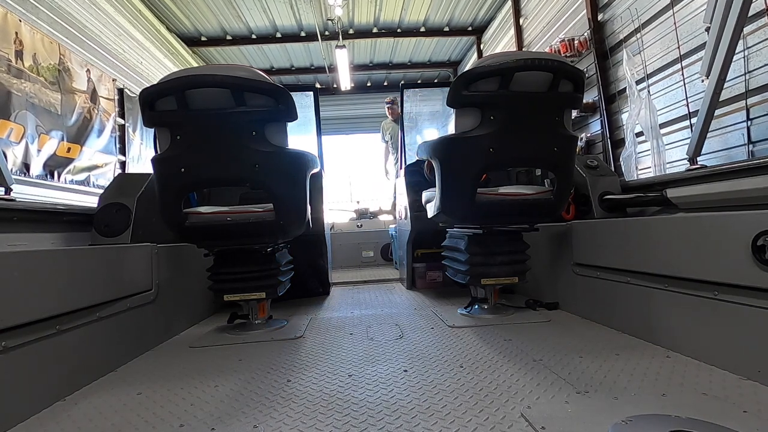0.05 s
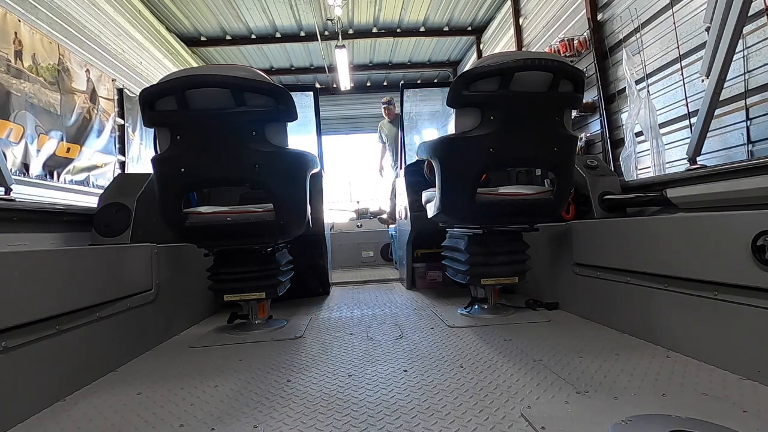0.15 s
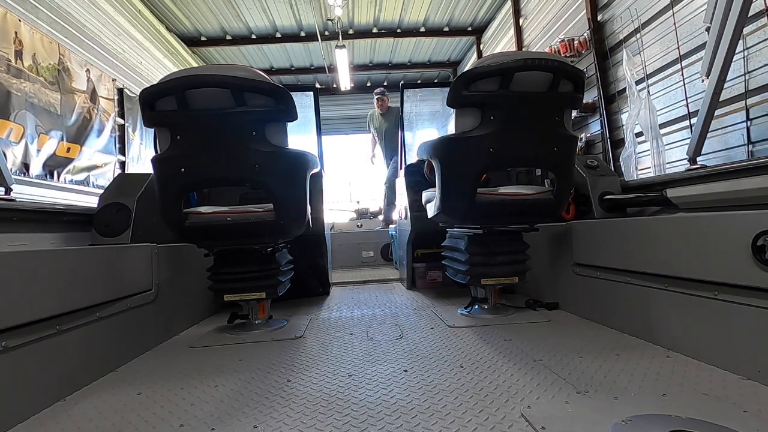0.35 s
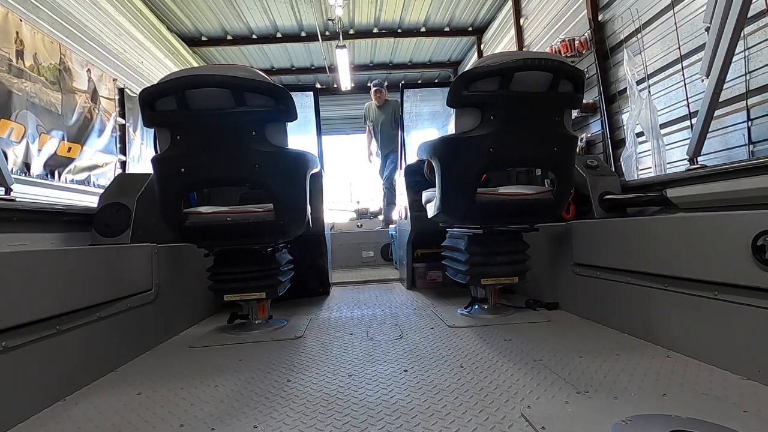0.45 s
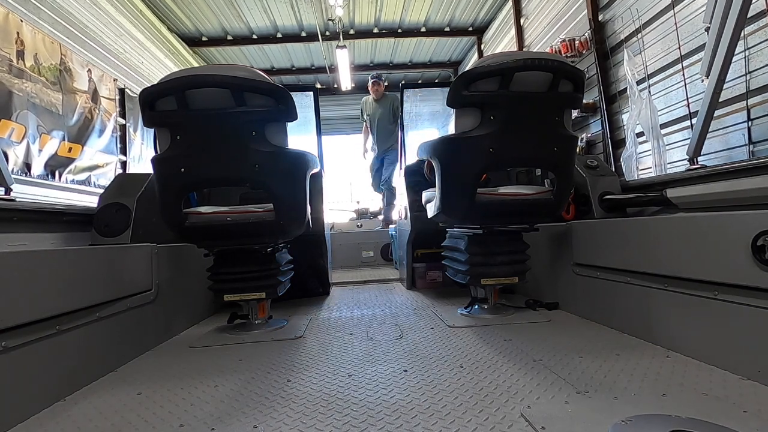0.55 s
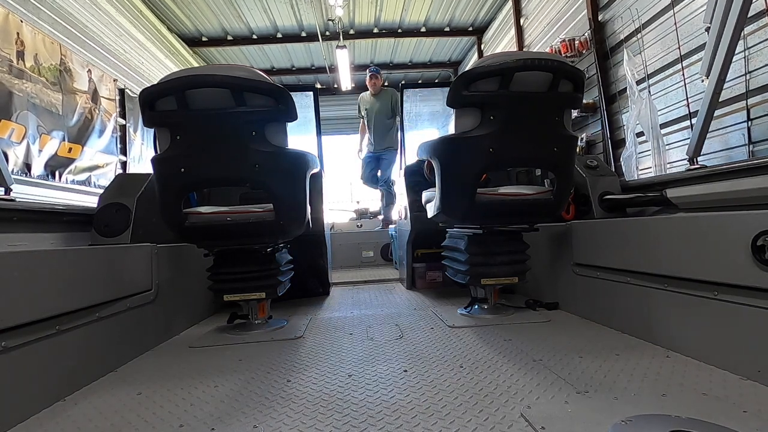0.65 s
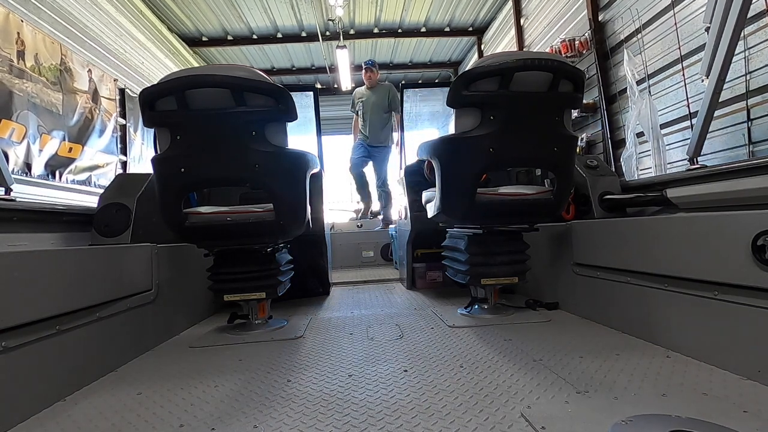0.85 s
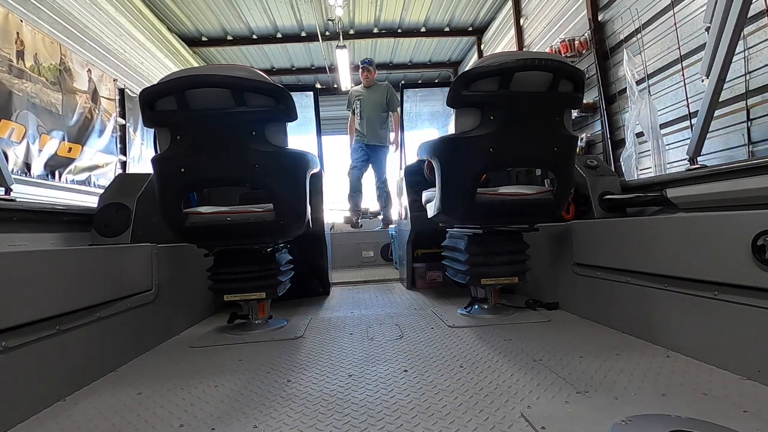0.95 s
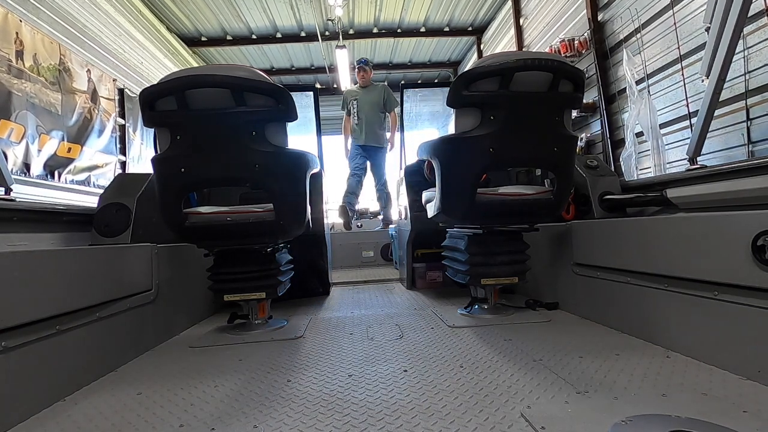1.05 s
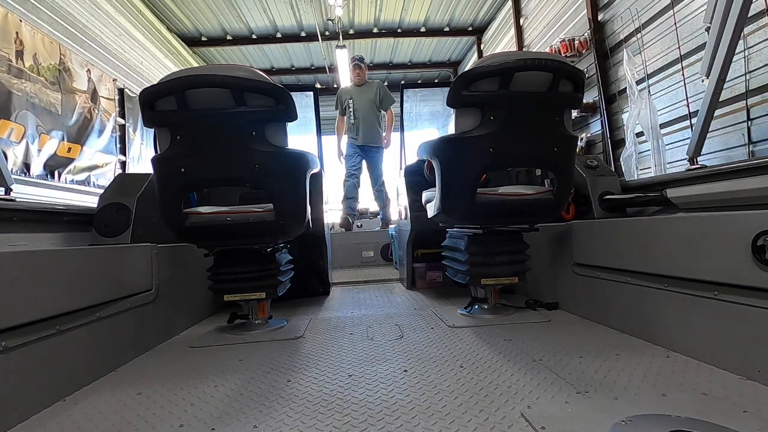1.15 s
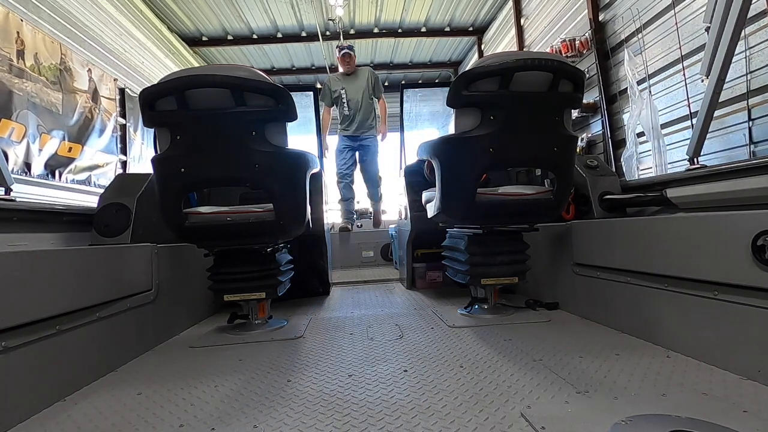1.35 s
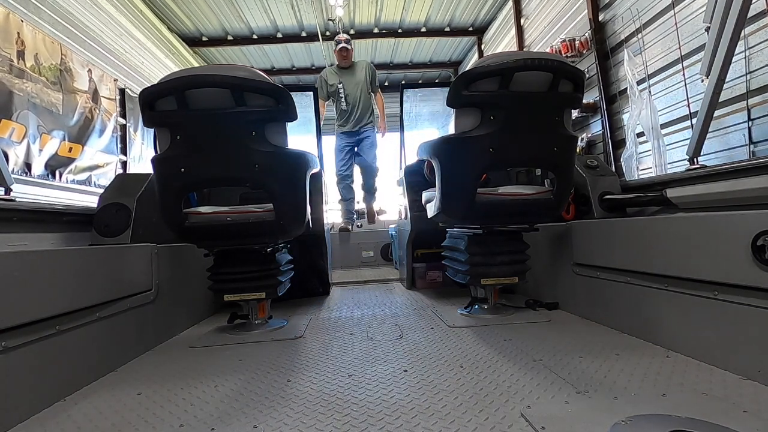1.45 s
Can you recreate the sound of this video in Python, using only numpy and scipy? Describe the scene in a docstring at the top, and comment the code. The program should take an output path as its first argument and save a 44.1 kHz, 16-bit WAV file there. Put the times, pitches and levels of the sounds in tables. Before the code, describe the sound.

Footsteps thud onto a boat's metal deck, with sharp clicks and a shed's echo.

```python
"""An aluminium hull booms as someone steps aboard a boat parked in a large metal shed.
A heavy footfall and softer ones knock on the metal plates and set them ringing, and the shed echoes.
Fittings snap as the deck takes the weight, and the boat shudders on its supports. Shoes tap, scuff
and press on grit, clothes rustle and something small jingles faintly over the hum of the shed."""
import sys
import numpy as np
from scipy import signal
from scipy.io import wavfile
from scipy.ndimage import uniform_filter1d

SR = 44100
rng = np.random.default_rng(int(sys.argv[2]) if len(sys.argv) > 2 else 0)


def digitize_waveform(pressure):
    """Quantize a signal to 16-bit integers and store it at the path in sys.argv[1].

    Rows of a 2-D input are taken as channels; values are limited to [-1, 1].
    """
    field = np.atleast_2d(pressure).T
    bounded = np.clip(field, -1, 1)
    quanta = np.round(bounded * 32767).astype(np.int16)
    wavfile.write(sys.argv[1], SR, quanta)


N = 66150
T = np.arange(N) / SR
BAND_EDGES_HZ = np.geomspace(28, 16500, 31)

# A "colour" says how strong each pitch of a noise is. "t60" is the time a sound takes to fade by 60 dB.
# colour of the air in the shed: f/Hz, level/dB
AIR_COLOUR = [(30, 5.5), (70, -6), (140, -6.5), (250, -12.5), (500, -19.5), (1000, -25), (2500, -31.5),
              (6500, -36), (10000, -40.5), (16000, -45)]
# strength of the boat's shudder: t/s, level/dB
SHUDDER_LEVEL = [(0, -41), (.2, -69.5), (.35, -44.5), (.52, -41), (.8, -45), (1.0, -44.5), (1.14, -52),
                 (1.28, -39), (1.5, -47.5)]
# loudness of the clothes: t/s, level/dB
CLOTH_LEVEL = [(0, -77), (.45, -64.5), (.62, -66), (.8, -65.5), (.88, -70.5), (.95, -67), (1.08, -71.5),
               (1.5, -61)]
# colour of the clothes: f/Hz, level/dB
CLOTH_COLOUR = [(200, 0), (700, 3), (1500, -0.5), (4000, -8.5), (8500, -10.5), (11000, -21), (16000, -22)]
# jingles of small metal: t/s, level/dB
JINGLE_EVENTS = [(.13, -71), (.55, -66), (0.906, -61)]
# pitches of the jingle: f/Hz, level/dB
JINGLE_TONES = [(6200, 2.5), (6620, -1), (9600, -7)]
# colour of grit under the sole: f/Hz, level/dB
GRIT_COLOUR = [(500, -11), (1500, 7), (3000, -1.5), (7000, -6), (10000, -11.5), (16000, -27)]
# light scuffs of a shoe: t/s, level/dB
SCUFF_EVENTS = [(0.129, -62), (.755, -59), (0.819, -66.5), (.907, -62.5), (.945, -57), (1.133, -60),
                (1.177, -45.5)]
# colour of a scuff: f/Hz, level/dB
SCUFF_COLOUR = [(700, -14), (1800, -6.5), (3000, -1), (4000, -4), (5000, -10.5), (9000, -26), (16000, -32)]
# snaps of the deck fittings: t/s, level/dB
SNAP_EVENTS = [(0.2718, -36), (1.3272, -41), (1.4296, -39.5)]
# colour of a snap: f/Hz, level/dB
SNAP_COLOUR = [(300, 3.5), (1200, -1.5), (2000, -2), (3200, -2.5), (4800, 0), (7500, 1), (9300, -3.5),
               (11000, -2.5), (14200, -12.5), (16500, -13)]
# how long a snap lingers in the shed: f/Hz, t60/s
SNAP_ECHO_FADE = [(1000, 0.49), (5000, 0.52), (14000, 0.33)]
# ringing tones of a fitting: f/Hz, level/dB, t60/s
FITTING_TONES = [(2815, -3, 0.071), (3900, -1.5, 0.15), (4565, -0.5, 0.13), (4860, -1.5, 0.11),
                 (6400, -11, .08), (7080, 0.5, .07)]
# light footfalls: t/s, level/dB, dull above f/Hz
TAP_EVENTS = [(0.031, -49, 380), (.412, -36.5, 128), (.533, -41, 171), (0.609, -43, 405), (.91, -44.5, 360),
              (1.012, -44, 386)]
# colour of a light footfall: f/Hz, level/dB
TAP_COLOUR = [(50, -16), (110, 5.5), (220, 1), (400, -0.5), (1000, -12), (3000, -10.5)]
# heel and sole landings: t/s, level/dB, dull above f/Hz, bass lift/dB, fade time factor,
# place (0 = boat's edge, 1 = deck), knock level/dB
CONTACTS = [(0.2426, -8, 553, 9, 0.47, 0, -7), (0.2505, -6.5, 737, 0, 0.88, 0.071, -5),
            (.2604, -4.5, 707, -15, 1, 0.17, 6.5), (1.1771, -20.5, 1420, 10, 0.94, 0.76, -8.5),
            (1.1895, -17.5, 1400, 8.5, 0.97, 0.92, -4.5), (1.288, -32.5, 350, 27, 0.76, 0, -13),
            (1.304, -27, 1270, 23.5, 0.73, 0.019, -20)]
# short swings of the plate under the foot: f/Hz, level/dB, t60/s
KNOCK_TONES = [(64.5, -27, 0.13), (123, -22.5, 0.051), (243, -21.5, 0.0074), (472, 1, 0.0074),
               (760, -13.5, .005)]
# main tones of the hull: f/Hz, level/dB when hit at the edge, level/dB when hit on the deck, t60/s
HULL_TONES = [(105.6, -17, -6, 0.78), (162, -3.5, 9, 0.32), (199, -14, 11, 0.27), (222, 1, -1.5, .55),
              (258, -2.5, -5, 0.56), (289.9, -1, -13, 0.54), (381.4, -2, 8.5, 0.33), (400.5, -4, 2, 0.43),
              (443.2, 3, -25, 0.48), (488.7, 1.5, -10, .44), (548, -9, -17, 0.25), (597, 6, -14.5, 0.41),
              (674.4, 1.5, 2.5, 0.46), (707, 5, -14, 0.27), (752, 6, -18, 0.46), (846, 2.5, -3, .4),
              (883, 1.5, -35, .3), (1195, -5, 4, 0.21)]
# colour of the boom, a blur of many close hull tones: f/Hz, level/dB
BOOM_COLOUR = [(40, -12.5), (80, -11), (150, -5.5), (250, -3.5), (450, 1.5), (750, -5), (1200, -10),
               (2000, -14), (4000, -10.5), (16000, -57)]
# how long the hull booms: f/Hz, t60/s
BOOM_FADE = [(60, 0.8), (150, 0.82), (450, 0.39), (1000, 0.57), (4000, 0.79), (14000, .35)]
# how long the shed echoes a footfall: f/Hz, t60/s
SHED_ECHO_FADE = [(200, 1.2), (1500, 1.56), (6000, .8), (14000, .4)]


def from_db(db):
    """Turn decibels into a number to multiply by."""
    return 10 ** (np.asarray(db) / 20)


def at_hz(table, hz):
    """Read a table between its rows, giving each octave equal room."""
    pitches, values = np.transpose(table)
    return np.interp(np.log(hz), np.log(pitches), values)


def band_noise(low, high):
    """Noise between two pitches, evened out to a steady strength of 1."""
    band = signal.butter(2, [low, high], "band", fs=SR, output="sos")
    noise = signal.sosfilt(band, signal.sosfilt(band, rng.standard_normal(N + SR // 2)))
    span = int(SR * max(.02, 1.5 / (high - low)))
    strength = np.sqrt(np.abs(uniform_filter1d(noise * noise, span)) + 1e-20)
    return (noise / strength)[-N:]


def shaped_noise(colour, loudness):
    """Noise of a given colour; each narrow band rises and falls with loudness(hz)."""
    lows, highs = BAND_EDGES_HZ[:-1], BAND_EDGES_HZ[1:]
    centres = np.sqrt(lows * highs)
    gains = from_db(at_hz(colour, centres)) * np.sqrt(highs - lows)
    gains /= np.linalg.norm(gains)
    return sum(gain * loudness(hz) * band_noise(low, high)
               for gain, hz, low, high in zip(gains, centres, lows, highs))


def burst(start, rise_s, t60, db=0):
    """Energy of a blow: it rises, then fades. Its square root is the height of the wave."""
    age = np.maximum(T - start, 0)
    fade = np.exp(-np.minimum(2 * np.log(1000) * age / t60, 100))
    return from_db(db) ** 2 * np.minimum(age / rise_s, 1) * fade


def ring(clicks, hz, t60):
    """Each click starts a fading tone as strong as the click."""
    fade = np.exp(-np.log(1000) / (t60 * SR))
    angle = 2 * np.pi * hz / SR
    return signal.lfilter([0, np.sin(angle)], [1, -2 * fade * np.cos(angle), fade ** 2], clicks + 1e-18)


def shed(hum_hz=126.7):
    """The shed gives a steady rush of air and a low hum."""
    air = shaped_noise(AIR_COLOUR, lambda hz: 1)
    hum = np.sqrt(2) * np.sin(2 * np.pi * hum_hz * T)
    return from_db(-55) * air + from_db(-63.5) * hum


def shudder(low_hz=11, high_hz=19):
    """The whole boat wobbles on its supports."""
    return from_db(np.interp(T, *np.transpose(SHUDDER_LEVEL))) * band_noise(low_hz, high_hz)


def clothes():
    """Cloth rustles faintly as the leg swings over."""
    level = from_db(np.interp(T, *np.transpose(CLOTH_LEVEL)))
    return shaped_noise(CLOTH_COLOUR, lambda hz: level)


def jingles(spread_hz=230):
    """Small metal shimmers briefly in clusters of high tones."""
    shimmer = sum(from_db(db) * band_noise(hz - spread_hz, hz + spread_hz) for hz, db in JINGLE_TONES)
    energy = sum(burst(start, rise_s=.002, t60=.35, db=db) for start, db in JINGLE_EVENTS)
    return shimmer / 2 * np.sqrt(energy)


def soles():
    """Grit hisses under each step, louder under a hard one; the shoe also scuffs lightly."""
    grit = np.sqrt(sum(burst(start, rise_s=.012, t60=.39 * length, db=-40.5 + .51 * db)
                       for start, db, _, _, length, _, _ in CONTACTS))
    scuffs = np.sqrt(sum(burst(start, rise_s=.00054, t60=.06, db=db) for start, db in SCUFF_EVENTS))
    return shaped_noise(GRIT_COLOUR, lambda hz: grit) + shaped_noise(SCUFF_COLOUR, lambda hz: scuffs)


def fitting_snaps():
    """A fitting takes the weight with a bright crack that lingers in the shed."""
    def loudness(hz):
        stretch = (7000 / hz) ** .68   # low pitches last longer, but start weaker
        energy = 0
        for start, db in SNAP_EVENTS:
            crack = min(1 / stretch, 2) * burst(start, rise_s=.00099, t60=.079 * stretch, db=db + 5.5)
            echo = burst(start, rise_s=.013, t60=at_hz(SNAP_ECHO_FADE, hz), db=db - 5.5)
            energy += crack + echo
        return np.sqrt(energy)
    return shaped_noise(SNAP_COLOUR, loudness)


def fitting_ring():
    """The snapping metal rings briefly, a little differently each time."""
    sound = 0
    for hz, tone_db, t60 in FITTING_TONES:
        clicks = np.zeros(N)
        for start, db in SNAP_EVENTS:
            clicks[int(start * SR)] = from_db(db + tone_db + rng.normal(0, 1))
        sound += ring(clicks, hz, t60)
    return from_db(-6.5) * sound


def taps():
    """Light footfalls give short, dull bumps that hardly ring the hull."""
    def loudness(hz):
        return np.sqrt(sum(burst(start, rise_s=.02, t60=.14, db=db) / (1 + (hz / dull_hz) ** 2.56)
                           for start, db, dull_hz in TAP_EVENTS))
    return from_db(10.5) * shaped_noise(TAP_COLOUR, loudness)


def foot_force(hz, db, dull_hz, bass_db, bass_hz=182):
    """How hard a foot drives one pitch: weight lifts the bass, the soft sole dulls the highs."""
    lift_db = bass_db / (1 + (hz / bass_hz) ** 2)
    return from_db(db + lift_db) / np.sqrt(1 + (hz / dull_hz) ** 6)


def knocks(cutoff_hz=1070):
    """The plate right under the foot swings and stops almost at once."""
    sound = 0
    for hz, tone_db, t60 in KNOCK_TONES:
        clicks = np.zeros(N)
        for start, db, dull_hz, bass_db, _, _, knock_db in CONTACTS:
            clicks[int(start * SR)] += foot_force(hz, db, dull_hz, bass_db) * from_db(tone_db + knock_db)
        sound += ring(clicks, hz, t60)
    return from_db(-3.5) * signal.sosfilt(signal.butter(3, cutoff_hz, fs=SR, output="sos"), sound)


def hull_ring(rise_s=.00076):
    """Each landing adds energy to the hull's main tones; how much depends on where the foot lands."""
    rise = np.exp(-1 / (rise_s * SR))
    sound = 0
    for hz, edge_db, deck_db, t60 in HULL_TONES:
        clicks = np.zeros(N)
        for start, db, dull_hz, bass_db, _, place, _ in CONTACTS:
            place_db = np.interp(place, [0, 1], [edge_db, deck_db])
            clicks[int(start * SR)] += foot_force(hz, db, dull_hz, bass_db) * from_db(place_db)
        fade = np.exp(-2 * np.log(1000) / (t60 * SR))
        energy = signal.lfilter([1], [1, -fade], clicks ** 2 + 1e-24)
        loudness = signal.lfilter([1 - rise], [1, -rise], np.sqrt(energy))   # softens each start
        sound += loudness * np.sin(2 * np.pi * (hz * T + rng.random()))
    return from_db(-26) * sound


def hull_boom():
    """Each landing shakes many close tones at once: a thump, a longer boom and the shed's echo."""
    def loudness(hz):
        energy = 0
        for start, db, dull_hz, bass_db, length, _, _ in CONTACTS:
            thump = burst(start, rise_s=.005, t60=.11, db=5.5)
            boom = burst(start, rise_s=.005, t60=length * at_hz(BOOM_FADE, hz))
            echo = burst(start, rise_s=.05, t60=at_hz(SHED_ECHO_FADE, hz), db=-24.5)
            energy += foot_force(hz, db, dull_hz, bass_db) ** 2 * (thump + boom + echo)
        return np.sqrt(energy)
    return from_db(-15.5) * shaped_noise(BOOM_COLOUR, loudness)


def scene():
    """Everything as heard from the deck, in one channel."""
    boarding = hull_boom() + hull_ring() + knocks() + taps() + soles() + clothes()
    small_metal = fitting_snaps() + fitting_ring() + jingles()
    return (boarding + small_metal + shudder() + shed())[None]


def record(dry):
    """The very highest pitches are cut off steeply."""
    cutoff_hz = 15800
    return signal.sosfilt(signal.ellip(10, .2, 80, cutoff_hz, fs=SR, output="sos"), dry)


dry = scene()
out = record(dry)
digitize_waveform(out)
```